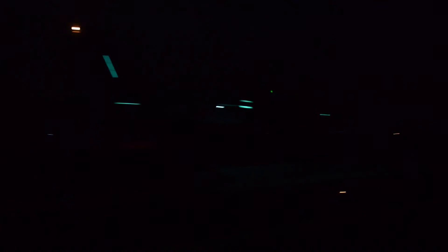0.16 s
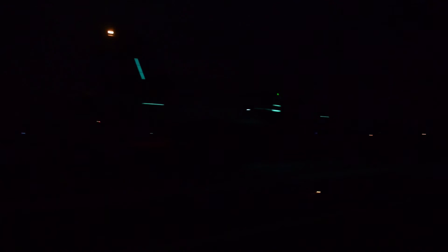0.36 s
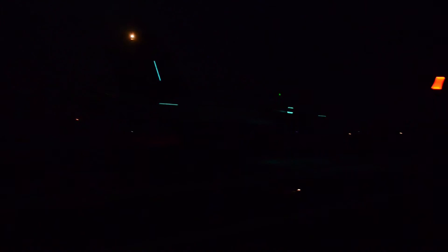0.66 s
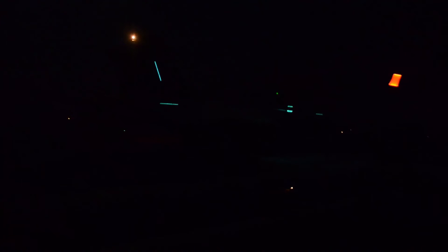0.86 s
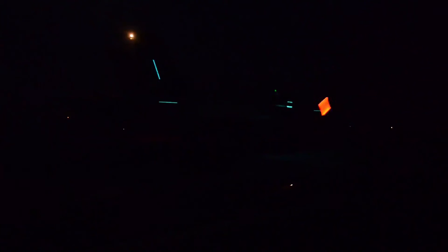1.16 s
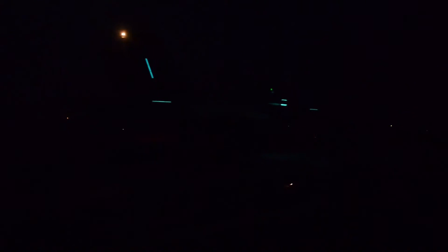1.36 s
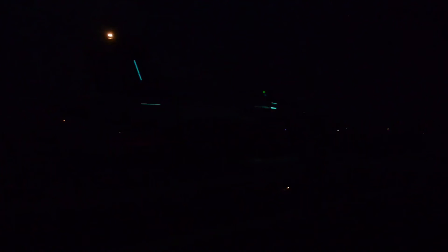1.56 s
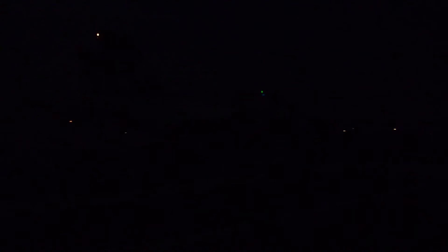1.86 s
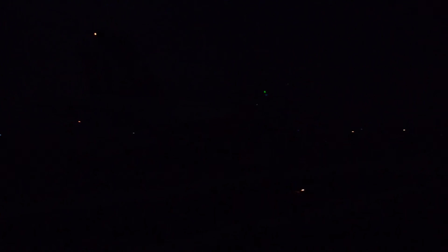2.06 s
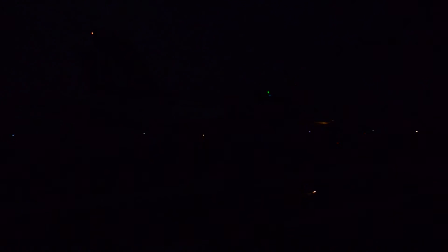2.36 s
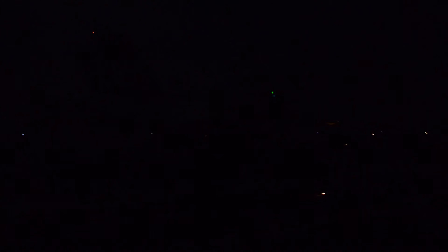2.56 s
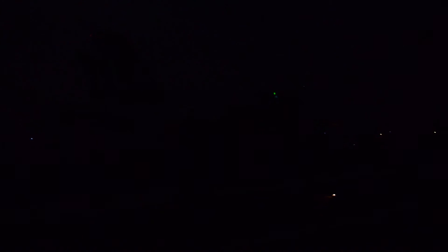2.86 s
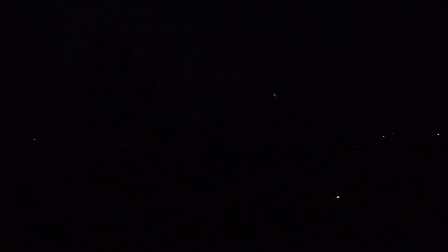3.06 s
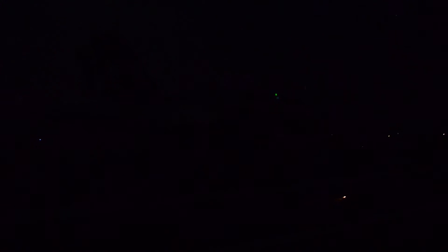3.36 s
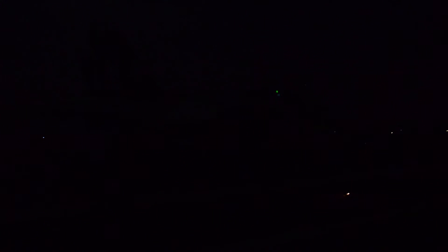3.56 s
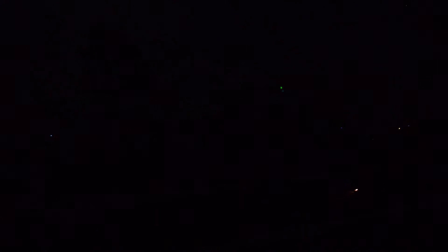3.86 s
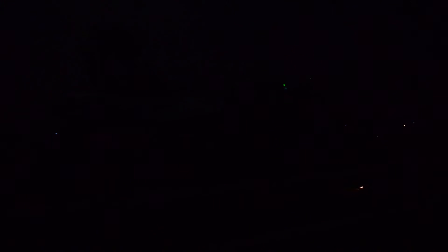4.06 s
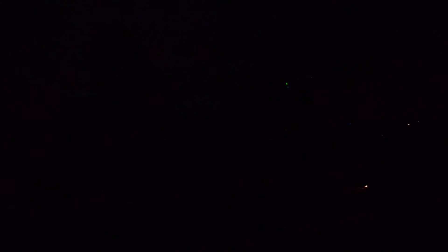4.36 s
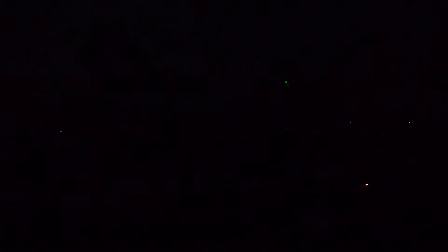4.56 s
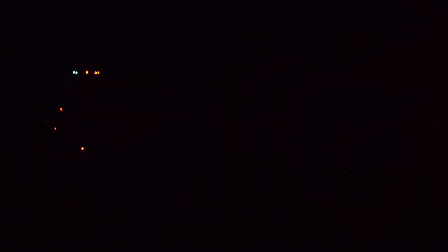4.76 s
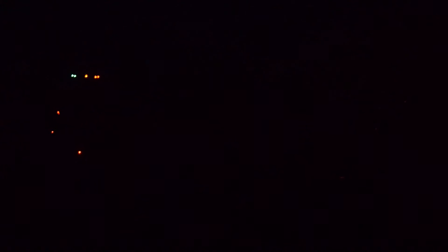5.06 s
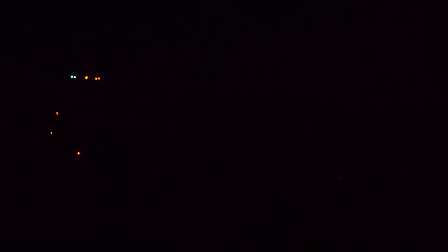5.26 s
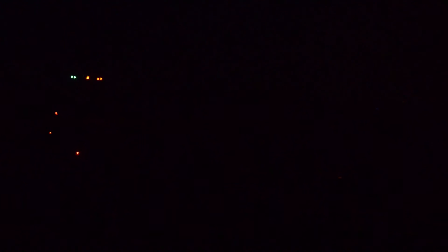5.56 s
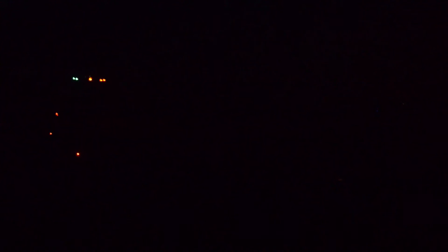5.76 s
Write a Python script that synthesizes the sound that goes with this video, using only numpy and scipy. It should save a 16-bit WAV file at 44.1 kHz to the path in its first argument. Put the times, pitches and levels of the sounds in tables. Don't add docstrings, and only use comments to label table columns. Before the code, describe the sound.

Outdoors on a steel flight deck, one microphone. A landing jet is at full blast from the start, crackling with overload, turning from harsh inlet whine to broad exhaust roar. It recedes to a dull rumble with faint, glinting, falling turbine tones. A hard cut brings a parked jet close by: steady airy idle, thin rapidly beating whine, one soft wind puff.

```python
import sys
import numpy as np
from scipy import signal
from scipy.fft import rfft, irfft, next_fast_len
from scipy.io import wavfile
from scipy.ndimage import uniform_filter1d

SR = 44100
rng = np.random.default_rng(int(sys.argv[2]) if len(sys.argv) > 2 else 0)


def magnitude_from_level(level_db):
    exponent = np.asarray(level_db, float) / 20
    return 10 ** exponent


def wav_out(sig):
    wavfile.write(sys.argv[1], SR, np.round(np.clip(np.atleast_2d(sig).T, -1, 1) * 32767).astype(np.int16))


N = 261072
CUT_S = 4.734
HZ = np.fft.rfftfreq(1024, 1 / SR)
FRAME_S = np.arange(N // 256 + 5) * 256 / SR


def evened(x):
    return x / np.sqrt(np.mean(x ** 2) + 1e-20)


def read(points, hz):
    f, value = np.transpose(points)
    return np.interp(np.log(hz + 1), np.log(f + 1), value)


def follow(rows):
    return np.interp(FRAME_S, *np.transpose(rows))


def chance(per_s):
    b, a = signal.butter(2, per_s, fs=SR)
    return evened(signal.lfilter(b, a, rng.standard_normal(N)))


def bumps(rows, width_s):
    return sum(height * np.exp(-((FRAME_S - s) / width_s) ** 2) for s, height in rows)


def glinting(rows, width_s):
    powers = [(s, magnitude_from_level(2 * db)) for s, db in rows]
    return 10 * np.log10(bumps(powers, width_s) + 1e-9)


def smoothed_noise(shape, bins, frames):
    x = uniform_filter1d(rng.standard_normal(shape), size=bins, axis=0)
    return evened(uniform_filter1d(x, size=frames, axis=1))


def turbulence(colour_db, levels, bands, patchy_db, gusty_db):
    power = magnitude_from_level(2 * colour_db) * np.ones(len(FRAME_S))
    lacks = [level - 10 * np.log10(power[(HZ >= lo) & (HZ < hi)].sum(0))
             for level, (lo, hi) in zip(levels, bands)]
    centres = np.sqrt(np.prod(bands, 1))
    share = np.array([read(np.c_[centres, one], HZ) for one in np.eye(len(bands))]).T
    a, b = rng.standard_normal((2,) + power.shape)
    patches = smoothed_noise(power.shape, 24, 10)
    gusts = smoothed_noise(power.shape, 200, 5)
    treble = np.clip(np.log2(HZ / 700 + 1) / 3, 0, 1)[:, None]
    field_db = colour_db + share @ lacks + patchy_db * patches + gusty_db * treble * gusts
    return 1.185 * signal.istft((a + 1j * b) * magnitude_from_level(field_db), nperseg=1024, noverlap=768)[1][:N]


def tone(s, hz, db, waver_hz, fade_db):
    t = np.arange(N) / SR
    turns = np.cumsum(np.interp(t, s, hz) + waver_hz * chance(59.4)) / SR
    level = np.interp(t, s, magnitude_from_level(db), 0, 0) * magnitude_from_level(fade_db * chance(25))
    return np.sqrt(2) * level * np.sin(2 * np.pi * turns)


# t/s, f/Hz, length/s, level/dB
WIND_PUFF = (5.1, 72, .05, -43)


def buffet():
    s, hz, length, db = WIND_PUFF
    t = np.arange(N) / SR - s
    return magnitude_from_level(db) * np.exp(-(t / length) ** 2) * np.sin(2 * np.pi * hz * t + 2 * chance(30))


# f/Hz, level/dB per Hz
IDLE_AIR_COLOUR = [(15, -45), (40, -15), (170, 7), (490, -8), (1400, -10), (1750, -3), (2300, -5.5),
                   (3300, -11.5), (4400, -15.5), (5400, -17.5), (7300, -13.5), (10500, -14), (12500, -21.5),
                   (15300, -34)]
# multiple of the blade rate, width/Hz, level/dB over the air
BLADE_HEAPS = [(.93, 220, 4), (2, 31, -2), (3, 120, 3), (4, 100, 3), (5, 100, 14), (6, 210, 11.5),
               (7, 190, 6), (8, 290, 5.5), (9, 330, 2), (10, 330, 1), (11, 330, -2)]
IDLE_LEVELS = (-48.5, -39, -37, -39.5)
IDLE_RISES = (-1, 0.43, .3, 1.3)
# low f/Hz, high f/Hz
IDLE_LAYER_BANDS = [
    (60, 400),
    (500, 1300),
    (1400, 4300),
    (4400, 13000),
]


def idle_air():
    blade_hz = 976
    heaps = sum(magnitude_from_level(2 * db) / (1 + (2 * (HZ - k * blade_hz) / width) ** 2) for k, width, db in BLADE_HEAPS)
    colour_db = read(IDLE_AIR_COLOUR, HZ) + 10 * np.log10(1 + heaps)
    levels = [db + rise * (FRAME_S - CUT_S - .5) for db, rise in zip(IDLE_LEVELS, IDLE_RISES)]
    return turbulence(colour_db[:, None], levels, IDLE_LAYER_BANDS, patchy_db=.6, gusty_db=.5)


# t/s, level/dB
WASH_LULLS = [
    (4.78, -4),
    (5.53, -2),
    (5.8, -8),
]
# factor on its pitch, level/dB
WHINE_OVERTONES = [(.28, -59), (.475, -55), (1.5, -60), (2, -58), (2.5, -55.5), (3, -61)]


def idle_whine():
    whine_hz, whine_db, sag_db_per_s = 1943, -41.5, -1.5
    beat_hz, first_null_s, partner = 6.05, 4.79, .5
    s = FRAME_S
    beat = abs(1 - partner * np.exp(2j * np.pi * beat_hz * (s - first_null_s)))
    db = whine_db + sag_db_per_s * (s - CUT_S) + 20 * np.log10(beat) + bumps(WASH_LULLS, .06)
    whine = tone(s, whine_hz + 0 * s, db, waver_hz=2, fade_db=.7)
    for k, over_db in WHINE_OVERTONES:
        whine = whine + tone(s, k * whine_hz + 0 * s, over_db + 0 * s, waver_hz=11 * k, fade_db=4.5)
    return whine


def idling_jet():
    return idle_air() + idle_whine()


# t/s, level/dB
COMPRESSOR_GLINTS = [(2.52, -45), (2.66, -44), (2.88, -47), (3.0, -52), (3.1, -49), (3.2, -50), (3.33, -47),
                     (3.45, -48), (3.63, -44.5), (3.8, -46), (3.92, -44.5), (4.13, -47), (4.25, -51),
                     (4.35, -50), (4.46, -48), (4.62, -53)]
# t/s, level/dB
FAN_GLINTS = [(4.27, -46), (4.35, -49), (4.42, -47), (4.5, -49), (4.56, -48), (4.67, -52)]
# t/s, half length/s, f/Hz, level/dB
PARKED_NEIGHBOUR = (4.17, .12, 4850, -55)


def landing_tones():
    spool_s, spool_hz, drop_hz, lag_s = 2.45, 9400, 6250, 4.5
    compressor_hz = spool_hz - drop_hz * (1 - np.exp((spool_s - FRAME_S) / lag_s))
    fan_hz = compressor_hz / 2.265
    s, half_s, hz, db = PARKED_NEIGHBOUR
    blades = [(compressor_hz, glinting(COMPRESSOR_GLINTS, .07)),
              (fan_hz, glinting(FAN_GLINTS, .035)),
              (hz + 20 * chance(4)[::256], glinting([(s, db)], half_s))]
    return sum(tone(FRAME_S[:len(hz)], hz, db[:len(hz)], waver_hz=20, fade_db=2) for hz, db in blades)


# f/Hz, level/dB per Hz
ARRIVAL_COLOUR = [(15, -61), (25, -31), (48, -33), (81, -18), (245, -12), (548, -10), (938, -1),
                  (1600, -8.5), (1940, -9.5), (8030, -13.5), (9690, -9), (13700, -18), (15300, -27.5)]
# f/Hz, level/dB per Hz
FRONT_COLOUR = [(15, -60), (25, -35), (49, -73), (119, -18.5), (265, -8.5), (938, -0.5), (1070, -0.5),
                (1480, -2), (1830, -2.5), (2100, 0), (3060, -3), (4820, -10), (9190, -15.5), (12300, -21),
                (15300, -34.5)]
# f/Hz, level/dB per Hz
REAR_COLOUR = [(15, -61), (25, -43), (129, -3.5), (187, -1), (419, -12.5), (644, 1.5), (717, -7), (777, -1),
               (1190, -10), (1480, -5.5), (3790, -13), (4950, -16), (7820, -15), (12300, -23.5),
               (15300, -37)]
# f/Hz, level/dB per Hz
FAR_COLOUR = [(15, -50), (25, -1), (187, 0), (408, -15.5), (610, -10), (1130, -8), (2210, -5), (2400, -4),
              (3140, -7), (3890, -16), (6840, -18), (11700, -22.5), (15300, -33.5)]
# t/s, f/Hz, level/dB over the air
DUCT_RING = [(0, 1900, -2), (.4, 1870, 4), (.7, 1860, 7.5), (1.05, 1850, 6.5), (1.3, 1850, 2),
             (1.5, 1820, 3), (1.76, 1730, 6), (1.95, 1700, -3), (4.73, 1700, -20)]


def landing_colour(stage):
    colours = [ARRIVAL_COLOUR, FRONT_COLOUR, REAR_COLOUR, FAR_COLOUR]
    colour_db = sum(read(colour, HZ)[:, None] * np.clip(1 - abs(stage - k), 0, 1)
                    for k, colour in enumerate(colours))
    s, hz, db = np.transpose(DUCT_RING)
    off = 2 * (HZ[:, None] - np.interp(FRAME_S, s, hz)) / 130
    ring = magnitude_from_level(2 * np.interp(FRAME_S, s, db)) / (1 + off ** 2)
    return colour_db + 10 * np.log10(1 + ring)


# t/s, stage (0 arrival, 1 nose on, 2 tail on, 3 far)
TURN_STAGES = [(0, .02), (.2, 0.26), (.45, 1.06), (1.2, 1.01), (2.1, 1.76), (2.4, 1.96), (3.4, 2.19),
               (4.1, 2.48), (4.73, 2.58)]
# t/s, level/dB
LANDING_LOUDNESS = [(0, -13), (.15, -13), (.5, -14.5), (.8, -13.5), (1.15, -15), (1.7, -15.5), (2.1, -18),
                    (2.5, -20.5), (2.75, -24.5), (3.1, -27.5), (3.3, -29.5), (3.65, -32.5), (3.9, -35),
                    (4.2, -39), (4.5, -43.5), (4.73, -44)]
# rumble, roar, fan, inlet hiss level/dB
SIDE_LEVELS = [
    (-20, -6.5, 0, -10.5),
    (-17.5, -7.5, 0, -1.5),
    (-8, -2.5, 0, -7.5),
    (1.5, 0.5, 0, 6),
]
# low f/Hz, high f/Hz
LANDING_LAYER_BANDS = [
    (60, 330),
    (450, 1200),
    (1300, 4200),
    (5000, 13000),
]
# t/s, level/dB
AIR_CLEARINGS = [(2.5, 2.5), (2.62, 1.5), (2.75, -1), (2.92, 1), (3.08, -3.5), (3.18, 1.5), (3.45, -1),
                 (3.63, 3.5), (3.85, -0.5), (4.25, 1)]
# t/s, level/dB
RUMBLE_THUMPS = [(.14, 0), (.7, -7), (1.65, -3.5), (2.41, 0), (3.18, -4), (3.68, -5), (3.94, -0.5),
                 (4.15, 0), (4.45, 7)]
# t/s, level/dB
ROAR_SURGES = [(.3, -1), (.75, -1.8), (1.12, -1), (1.6, 2), (2.05, 2), (3.0, -0.28), (3.5, 0.92),
               (4.68, 2.3)]


def landing_jet():
    stage = follow(TURN_STAGES)
    loud_db = follow(LANDING_LOUDNESS)
    loud_db = loud_db + 0.42 * np.maximum(loud_db + 20.5, 0)
    rumble, roar, fan, hiss = (loud_db + np.interp(stage, range(len(SIDE_LEVELS)), db)
                               for db in np.transpose(SIDE_LEVELS))
    clear_db = bumps(AIR_CLEARINGS, 0.046)
    levels = [rumble + bumps(RUMBLE_THUMPS, 0.081),
              roar + bumps(ROAR_SURGES, 0.12),
              fan + 0.15 * clear_db,
              hiss + clear_db]
    gusty_db = 0.5 + 0.43 * np.clip(stage - 1, 0, 1)
    air = turbulence(landing_colour(stage), levels, LANDING_LAYER_BANDS, patchy_db=0.32, gusty_db=gusty_db)
    return air + landing_tones()


def scene():
    after = np.clip((np.arange(N) / SR - CUT_S) / .004, 0, 1)
    mono = landing_jet() * (1 - after) + (idling_jet() + buffet()) * after
    return np.array([mono, mono])


def band(x, lo_hz, hi_hz):
    size = next_fast_len(len(x) + 4096)
    hz = np.fft.rfftfreq(size, 1 / SR)
    return irfft(rfft(x, size) * ((hz >= lo_hz) & (hz < hi_hz)), size)[:len(x)]


def patch_noise(lo_hz, hi_hz):
    line = np.arange(2048)
    place = line + 512.5
    inside = (line >= lo_hz * 2048 / SR) & (line < hi_hz * 2048 / SR)
    values = rng.standard_normal((2, 2048)) * inside
    waves = np.fft.ifft(values * np.exp(1j * np.pi * 512.5 * line / 1024)) * np.exp(1j * np.pi * place / 2048)
    return waves.real


# t/s, rate/per s
SWAP_RATE = [(0, 17), (1.8, 14), (2.2, 3), (4.7, 3), (5.9, 11)]


def swaps():
    low_hz, top_hz, wide_hz = 4200, 15300, (900, 2200)
    s = np.repeat(np.arange(3, N // 1024 - 2) * 1024 / SR, 2)
    pick, place, wide = rng.random((len(s), 3)).T
    lo_hz = low_hz + np.sin(np.pi * place ** 1.41 / 2) ** 2 * (top_hz - wide_hz[0] - low_hz)
    hi_hz = np.minimum(lo_hz + np.interp(wide, (0, 1), wide_hz), top_hz)
    picked = pick < np.interp(s, *np.transpose(SWAP_RATE)) * 512 / SR
    return np.c_[s, lo_hz, hi_hz][picked]


def swapped(mono):
    out = np.array([mono, mono])
    window = signal.windows.kaiser_bessel_derived(2048, 4 * np.pi)
    for s, lo_hz, hi_hz in swaps():
        start = 356 + 1024 * round((s * SR - 356) / 1024 - 1)
        patch = band(mono[start:start + 2048], lo_hz, hi_hz)
        refill = magnitude_from_level(-3.3) * patch.std() * evened(window * patch_noise(lo_hz, hi_hz))
        out[:, start:start + 2048] += refill - window ** 2 * patch
    return out


def band_limit(x):
    return signal.sosfilt(signal.butter(12, 15730, fs=SR, output="sos"), x)


def record(dry):
    clipped = np.clip(dry[0], -.4, .4)
    thinned = signal.lfilter(*signal.butter(2, 60, "high", fs=SR), clipped)
    smeared = signal.lfilter([-.36, 1], [1, -.36], thinned)
    mix = swapped(band(smeared, 0, 15070))
    return band_limit(mix)


dry = scene()
out = record(dry)
wav_out(out)
```